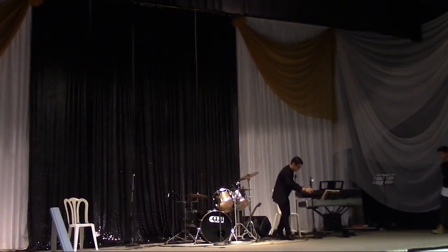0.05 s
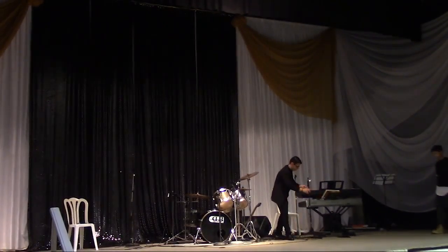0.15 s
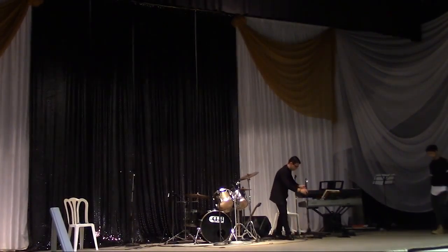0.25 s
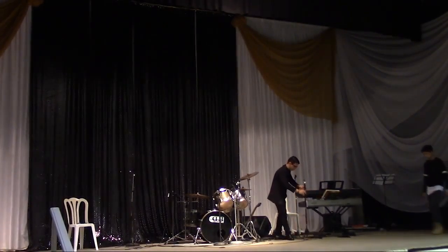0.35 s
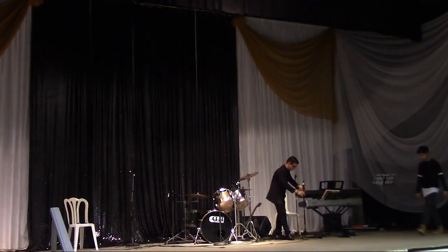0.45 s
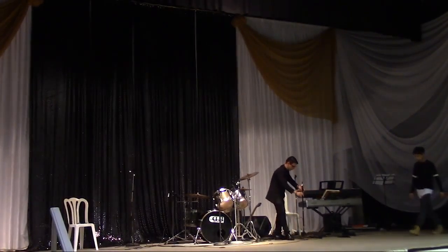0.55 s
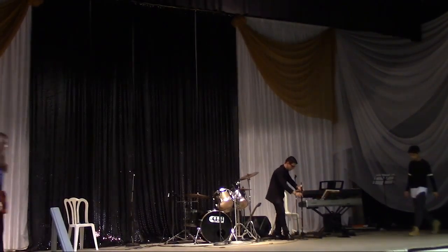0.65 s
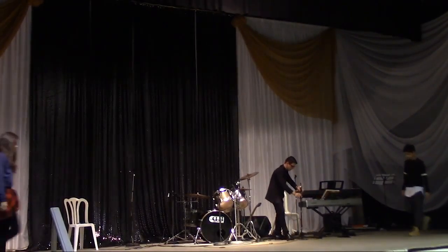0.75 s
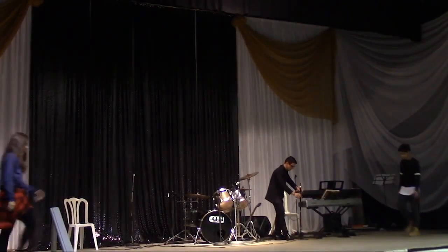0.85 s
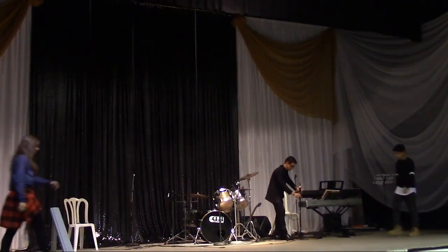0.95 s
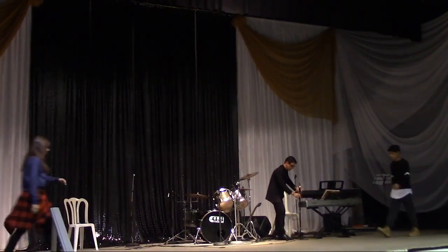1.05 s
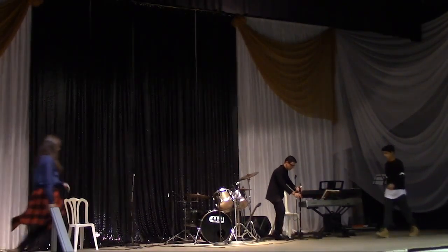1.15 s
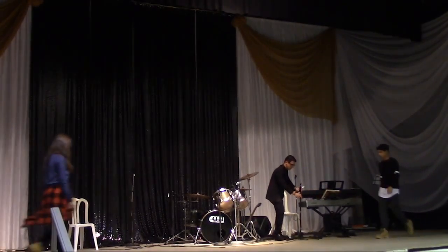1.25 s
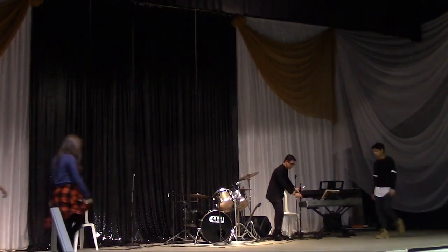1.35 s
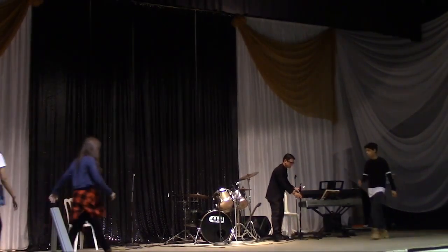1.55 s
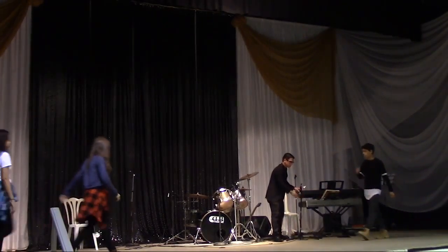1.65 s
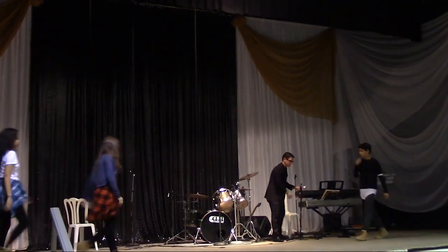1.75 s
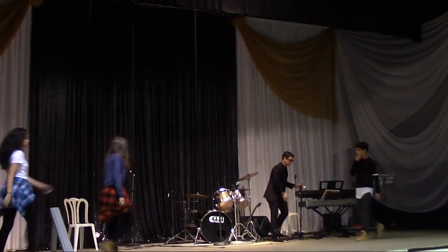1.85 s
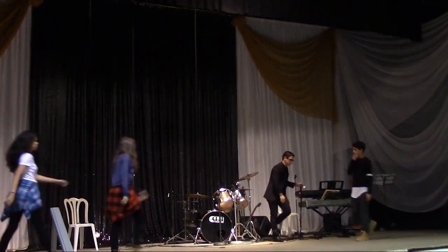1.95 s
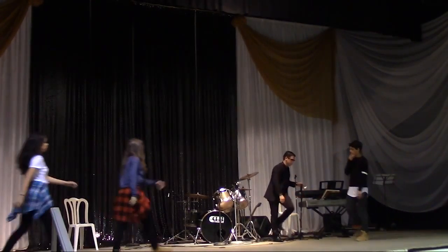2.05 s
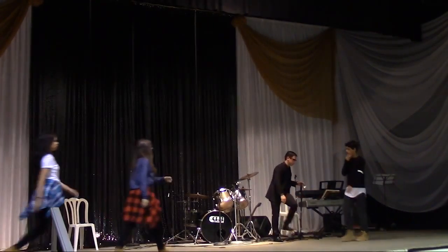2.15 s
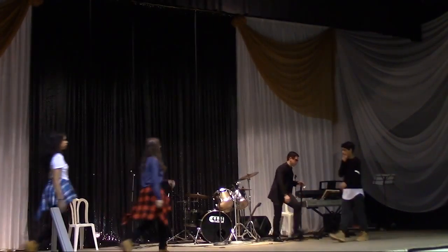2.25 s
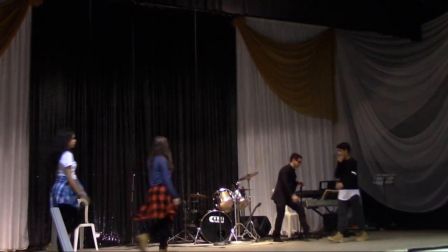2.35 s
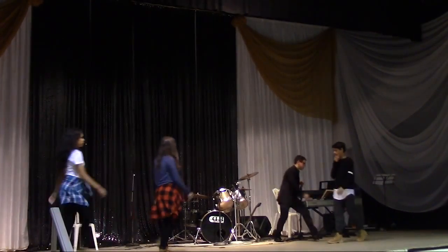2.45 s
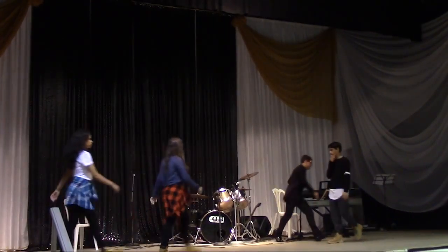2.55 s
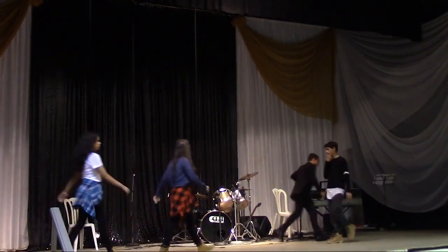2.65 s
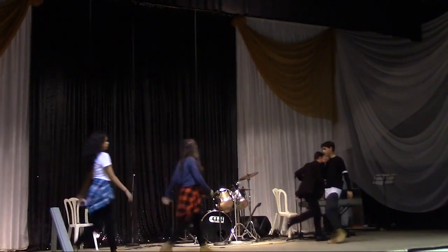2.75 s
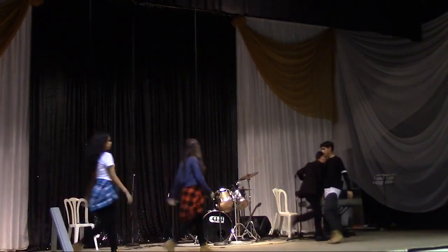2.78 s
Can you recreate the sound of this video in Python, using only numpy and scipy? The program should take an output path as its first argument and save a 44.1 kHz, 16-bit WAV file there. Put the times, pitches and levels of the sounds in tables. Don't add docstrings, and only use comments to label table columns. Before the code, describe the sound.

Close, overloaded microphone: broadband rushing noise, bright sizzle and low irregular air thumps that make the roar duck. It weakens slightly, then a hard unplugging click with a short bass thud stops everything. The open line remains, faint low mains hum with a slight buzz and even hiss, almost identical on both sides, unchanging.

```python
import sys
import numpy as np
from scipy import signal
from scipy.fft import rfft, irfft
from scipy.io import wavfile
from scipy.ndimage import uniform_filter1d

SR = 44100
rng = np.random.default_rng(int(sys.argv[2]) if len(sys.argv) > 2 else 0)


def gain_from_db(level_db):
    decades = np.asarray(level_db, float) / 20
    return 10 ** decades


def store_pcm(level_fs):
    pcm = np.round(np.clip(level_fs, -1, 1) * 32767).astype(np.int16)
    wavfile.write(sys.argv[1], SR, np.atleast_2d(pcm).T)


N = 306054
TIME = np.arange(N) / SR
UNPLUG_S = 0.36956
LIVE_N = round(UNPLUG_S * SR)
LIVE_TIME = TIME[:LIVE_N]


def rms_one(x):
    return x / np.sqrt(np.mean(x ** 2) + 1e-20)


def coloured(spectrum, size):
    hz, db = np.transpose(spectrum)
    bins_hz = np.fft.rfftfreq(size, 1 / SR) + 1e-3
    gain = gain_from_db(np.interp(np.log(bins_hz), np.log(hz), db, left=-60, right=-60))
    return rms_one(irfft(rfft(rng.standard_normal(size)) * gain, size))


def resonance(x, hz, width_hz):
    r = np.exp(-np.pi * width_hz / SR)
    return signal.lfilter([1, 0, -1], [1, -2 * r * np.cos(2 * np.pi * hz / SR), r * r], x)


def harmonics(table, hz, t):
    phases = rng.uniform(0, 2 * np.pi, len(table))
    out = np.zeros(len(t))
    for (multiple, db), phase in zip(table, phases):
        out += gain_from_db(db) * np.sqrt(2) * np.sin(2 * np.pi * multiple * hz * t + phase)
    return out


SAG_S, SAG_WIDTH_S = 0.15, 0.038


def sag(late_s):
    return np.exp(-((LIVE_TIME - SAG_S - late_s) / SAG_WIDTH_S) ** 2)


# pitch_hz, level_db (per Hz)
ROAR_SPECTRUM = [(45, -30), (70, -14), (150, -1.5), (280, -5), (450, -5), (800, -7), (1220, -10.5),
                 (1600, -9.5), (2200, -15), (3800, -16.5), (5300, -24.5), (5600, -27), (7600, -34),
                 (15900, -54)]
# pitch_hz, width_hz, level_db (rms)
CASING_MODES = [(1454, 23, -43), (1710, 240, -37.5), (5230, 290, -40), (6950, 770, -48.5)]


def roar():
    rattle_db = 1.2 * coloured([(20, -11), (200, -10), (500, 1)], LIVE_N)
    level_db = -21 - 1.5 * sag(0) + rattle_db
    out = gain_from_db(level_db) * coloured(ROAR_SPECTRUM, LIVE_N)
    for hz, width_hz, db in CASING_MODES:
        ringing = resonance(rng.standard_normal(LIVE_N), hz, width_hz)
        out += gain_from_db(db) * rms_one(resonance(ringing, hz, width_hz))
    return out


def sizzle():
    drop = np.clip((LIVE_TIME - SAG_S) / SAG_WIDTH_S + 1, 0, 1)
    fade_db = 27 * np.maximum(LIVE_TIME - SAG_S, 0)
    spectrum = [(5500, -3), (8500, 0.5), (10500, -2.0), (12500, -15), (16000, -18)]
    return gain_from_db(-36.5 - 6 * drop - fade_db) * coloured(spectrum, LIVE_N)


ROTOR_HZ = 140.08
# multiple of rotor_hz, level_db (rms)
WHINE_TONES = [(47, -56), (48, -47.5), (49, -54), (50, -48.5), (51, -50.5)]


def whine():
    flutter_db = 2.0 * coloured([(3, 2), (30, 2), (60, -13)], LIVE_N)
    return gain_from_db(-9 * sag(0.04) + flutter_db) * harmonics(WHINE_TONES, ROTOR_HZ, LIVE_TIME)


def machine():
    return roar() + sizzle() + whine()


# pitch_hz, level_db (per Hz)
RUMBLE_SPECTRUM = [(30, -30), (50, -8), (75, 13.5), (130, -12), (250, -0.5), (400, -27)]
# time_s, level_db
GUST_CURVE = [(0.0, -20), (0.04, -7.5), (0.076, -21.5), (0.116, -9.5), (0.156, -18.5), (0.182, -7),
              (0.22, -25), (0.28, -42), (0.36, -26)]
# peak_s, level_db (peak), swing_hz, push (1) or pull (-1)
AIR_PUFFS = [(.001, -9.5, 101, -1), (0.0308, -13, 128, -1), (0.0448, -10, 128, 1), (0.0705, -11.5, 260, 1),
             (0.087, -10, 171, 1), (0.098, -9.5, 118, 1), (0.1041, -8, 200, -1), (0.1114, -2.5, 130, 1),
             (0.1193, -8, 98, -1), (0.127, -11, 70.6, 1), (0.146, -11, 106, 1), (0.158, -4.5, 215, 1),
             (0.1733, -6.5, 122, -1), (0.187, -15, 88.5, -1), (.201, -10.5, 150, -1)]


def buffeting():
    gust_s, gust_db = np.transpose(GUST_CURVE)
    level_db = np.interp(LIVE_TIME, gust_s, gust_db) - 6.0
    out = gain_from_db(level_db) * coloured(RUMBLE_SPECTRUM, LIVE_N)
    for peak_s, db, hz, push in AIR_PUFFS:
        turns = (LIVE_TIME - peak_s) * hz
        swings = max(0.515 + 0.03 * (db + 8), 0.2)
        out += push * gain_from_db(db) * np.cos(2 * np.pi * turns) * np.exp(-(turns / swings) ** 2)
    return signal.sosfilt(signal.butter(1, 40, "high", fs=SR, output="sos"), out)


def limiter_gain(x):
    threshold_db, cut_per_db, recover_db_s = -10, 1.5, 600
    over_db = np.maximum(20 * np.log10(np.maximum(x, 1e-9)) - threshold_db, 0)
    ramp_db = recover_db_s * TIME[:len(x)]
    held_db = np.maximum.accumulate(cut_per_db * over_db + ramp_db) - ramp_db
    return gain_from_db(-uniform_filter1d(held_db, size=60))


MAINS_HZ = 60.032
# multiple of mains_hz, level_db (rms)
HUM_TONES = [(1, -48), (2, -70.8), (3, -69), (4, -79.5), (5, -64.9), (7, -76), (8, -83), (9, -69.1),
             (10, -84), (11, -68.5), (13, -76.5), (15, -79.2), (17, -78), (19, -78.5), (21, -85)]


def hum():
    return harmonics(HUM_TONES, MAINS_HZ, TIME)


# pitch_hz, level_db (per Hz)
HISS_SPECTRUM = [(22, -5), (40, 2), (90, -2.5), (200, -3), (600, -3), (1500, -2.5), (3000, -2),
                 (6000, -0.5), (9000, 0), (13000, -1), (16000, -2.5)]


def hiss():
    return gain_from_db(-48.5) * coloured(HISS_SPECTRUM, N)


def unplug():
    t = np.maximum(TIME - UNPLUG_S, 0)
    spike = -gain_from_db(-4) * np.exp(-t / 0.00013) * (t > 0)
    tick = gain_from_db(-9) * np.exp(-((TIME - UNPLUG_S + 5e-5) / 4e-5) ** 2)
    contact = signal.sosfilt(signal.butter(2, 10000, fs=SR, output="sos"), spike + tick)
    settle_hz, settle_db, settle_t60_s = 92, -15.5, 0.028
    settling = gain_from_db(settle_db - 60 * t / settle_t60_s) * np.sin(2 * np.pi * settle_hz * t)
    return contact + settling


def scene():
    air = buffeting()
    line = hum() + hiss() + unplug()
    line[:LIVE_N] += air + limiter_gain(air) * machine()
    return np.array([line, line])


def split_cells(x):
    offset, hop = 835, 1024
    first_block, calm_block = 9, 16
    window = np.sin(np.pi * (np.arange(2 * hop) + 0.5) / (2 * hop))
    n = np.arange(2 * hop) + (1 + hop) / 2
    calm_blocks = (N - offset) // hop - 1 - calm_block
    draws = rng.random((round(10.5 * N / SR), 3))
    splits = [(first_block, 0, 1)]
    splits += [(int(calm_block + when * calm_blocks), where, wide) for when, where, wide in draws]
    out = x.copy()
    for block, where, wide in splits:
        start = offset + hop * block
        span = slice(start, start + 2 * hop)
        low_hz = 4200 + 10400 * where ** 1.25
        high_hz = low_hz + min(low_hz / 4.5, 1380) * (1 + wide ** 3)
        low_bin = round(low_hz * 2 * hop / SR)
        high_bin = min(round(high_hz * 2 * hop / SR), 736)
        k = np.arange(low_bin, high_bin) + 0.5
        waves = np.sqrt(2 / hop) * window * np.cos(np.pi / hop * np.outer(k, n))
        cells = waves @ x[0, span]
        noise = rng.standard_normal((2, len(k))) * np.sqrt(np.mean(cells ** 2))
        out[:, span] += (noise - cells) @ waves
    return out


def band_limit(x):
    return signal.sosfilt(signal.butter(12, 15850, fs=SR, output="sos"), x)


def record(dry):
    ceiling, top_hz = 0.55, 15745
    spectrum = rfft(ceiling * np.tanh(dry / ceiling))
    edge = np.clip((top_hz - np.fft.rfftfreq(N, 1 / SR)) / 50 + 0.5, 0, 1)
    mix = split_cells(irfft(spectrum * edge, N))
    return band_limit(mix)


dry = scene()
out = record(dry)
store_pcm(out)
```